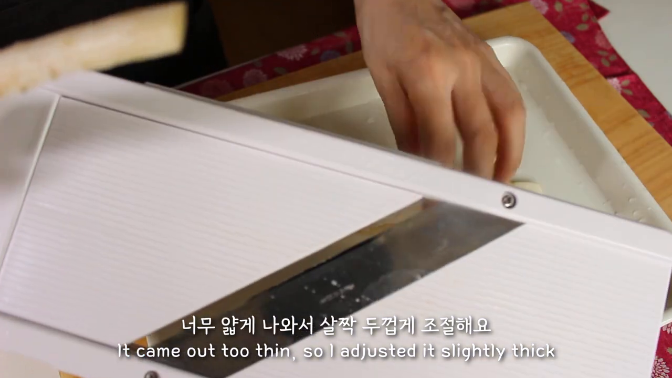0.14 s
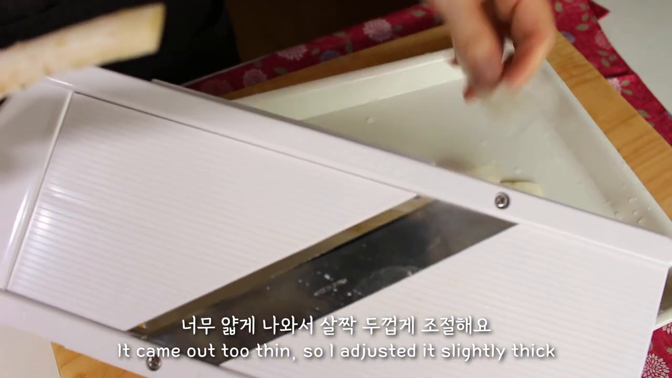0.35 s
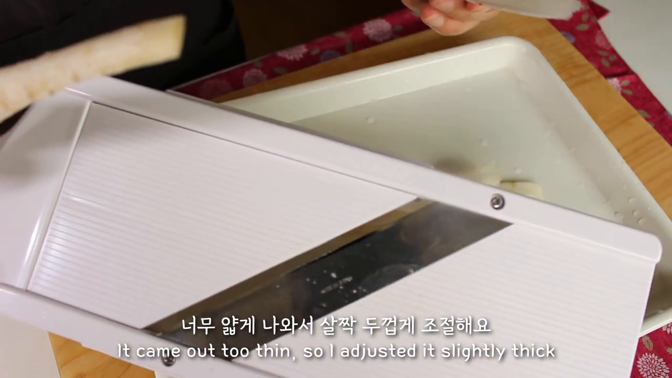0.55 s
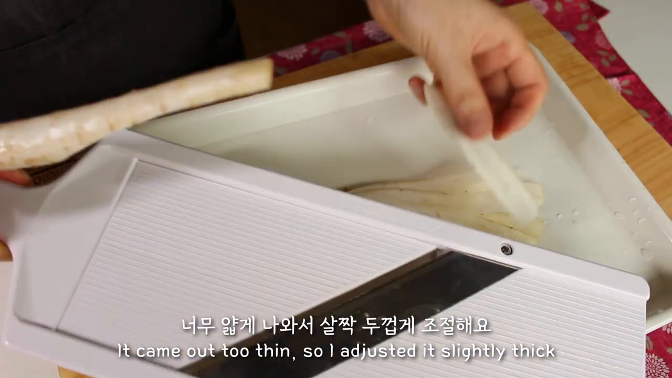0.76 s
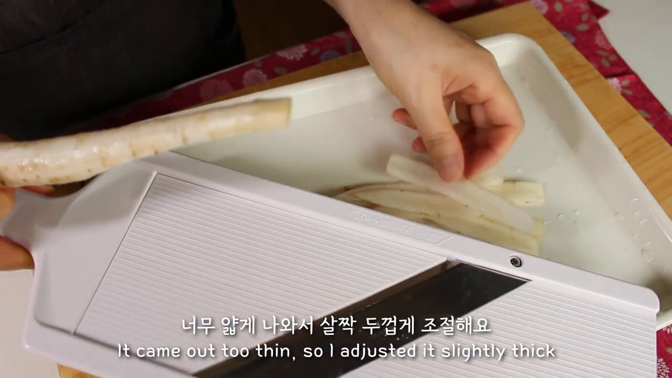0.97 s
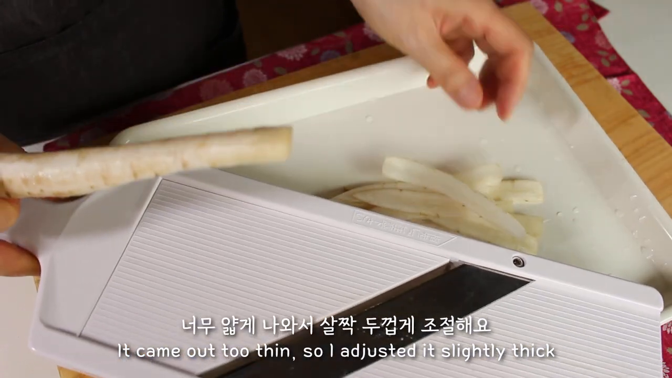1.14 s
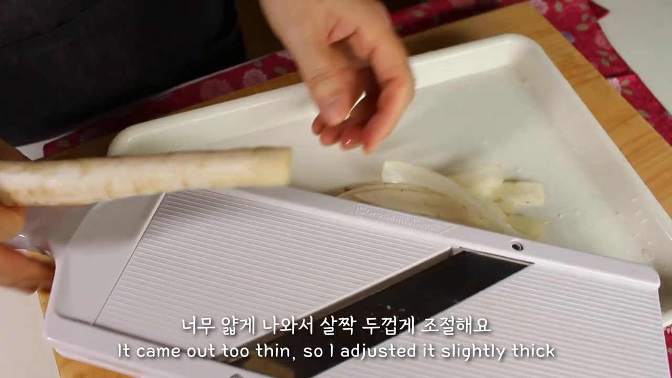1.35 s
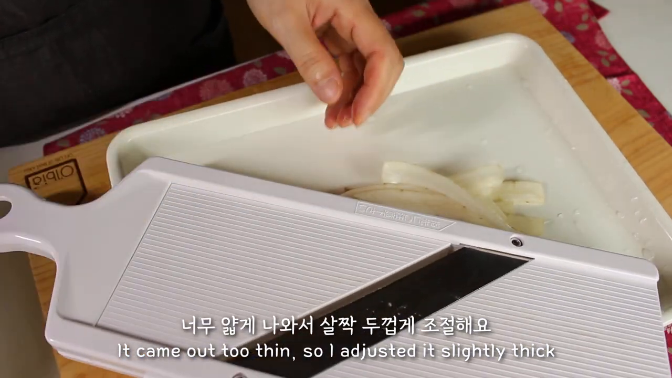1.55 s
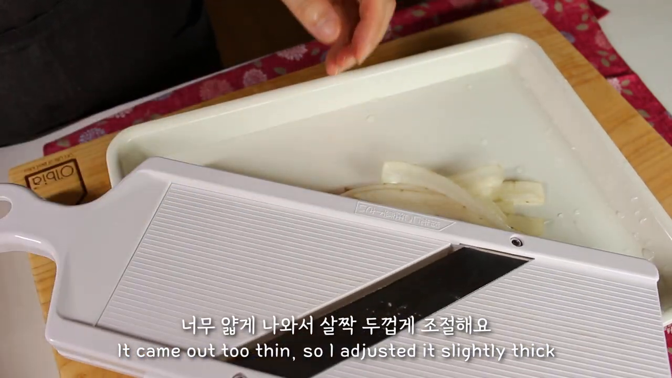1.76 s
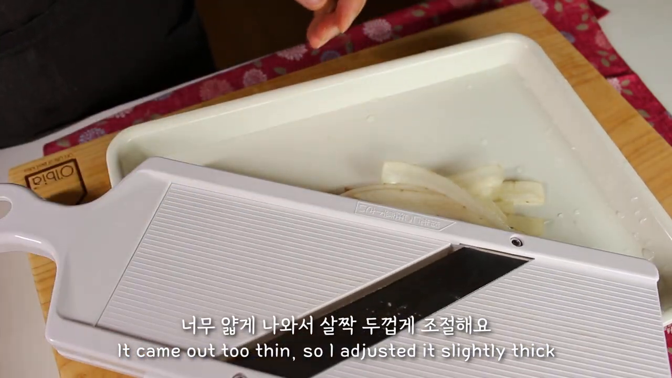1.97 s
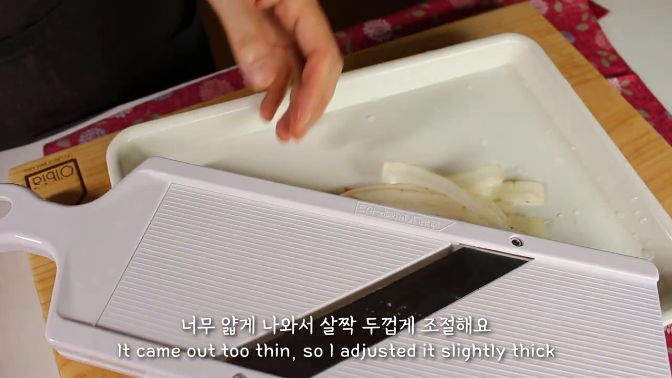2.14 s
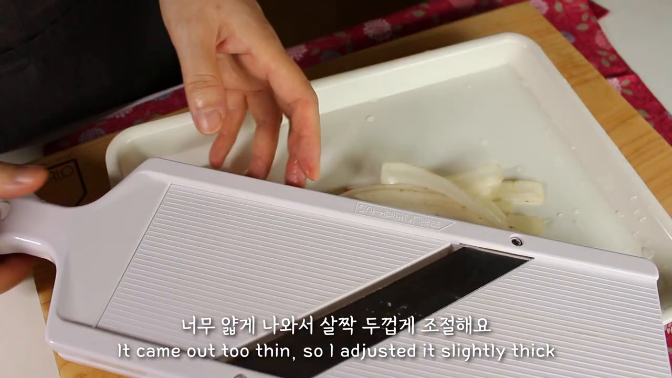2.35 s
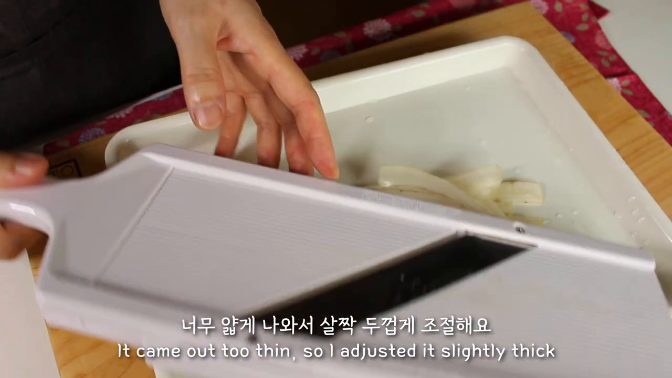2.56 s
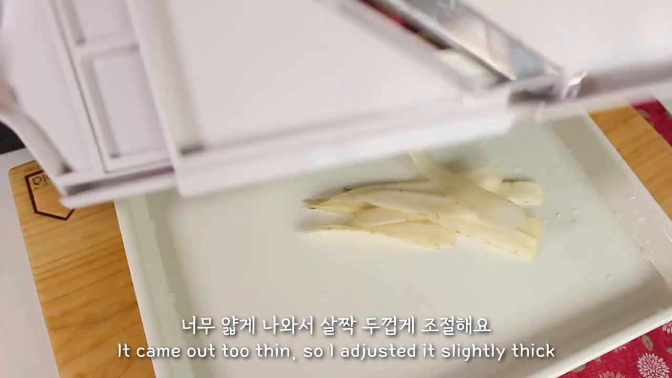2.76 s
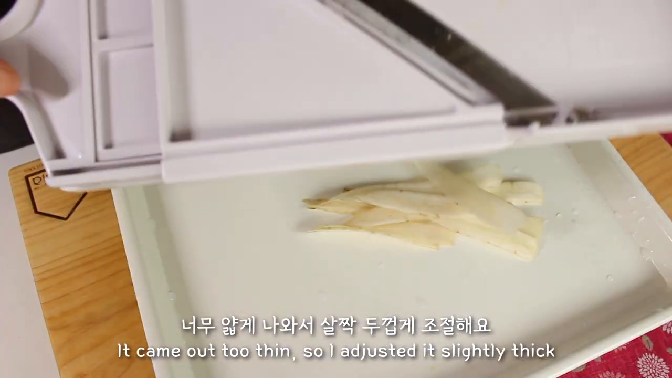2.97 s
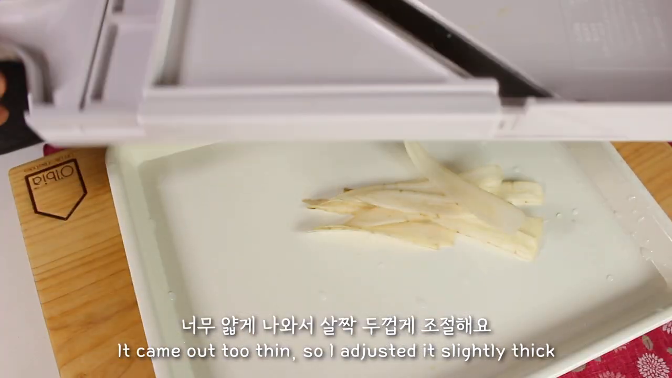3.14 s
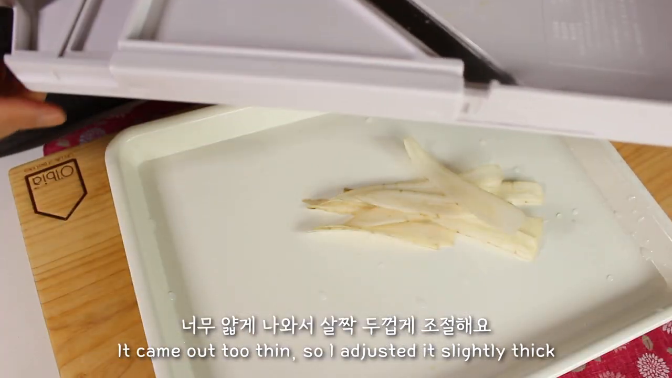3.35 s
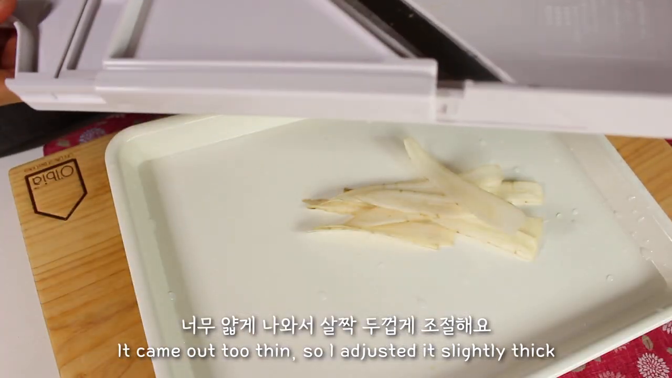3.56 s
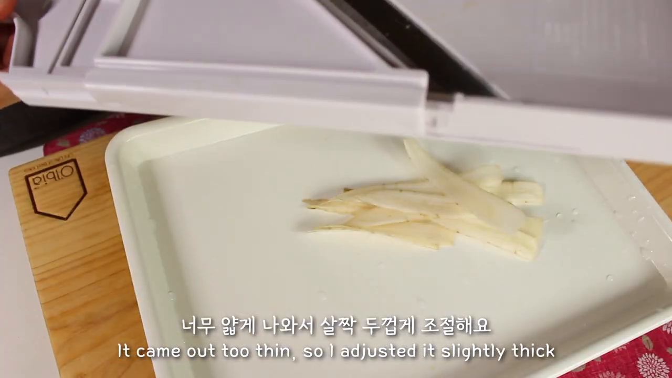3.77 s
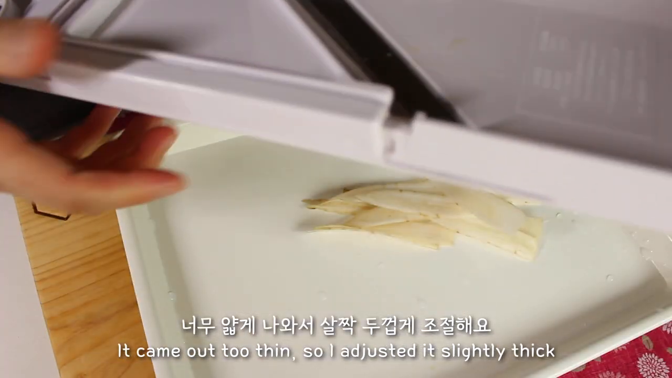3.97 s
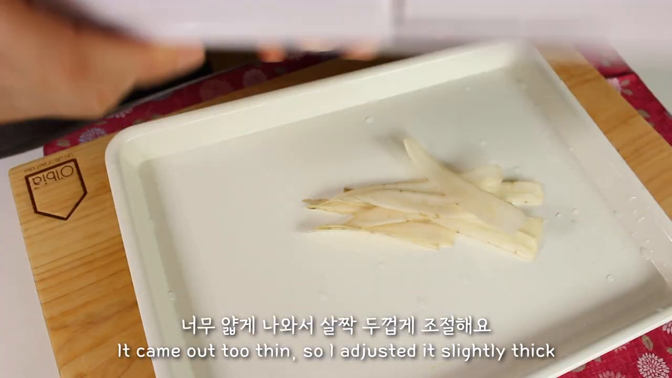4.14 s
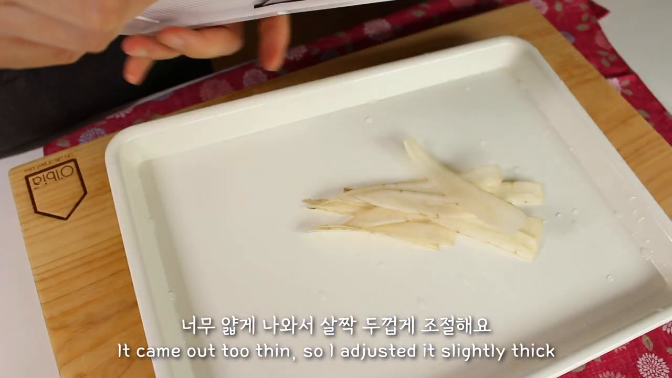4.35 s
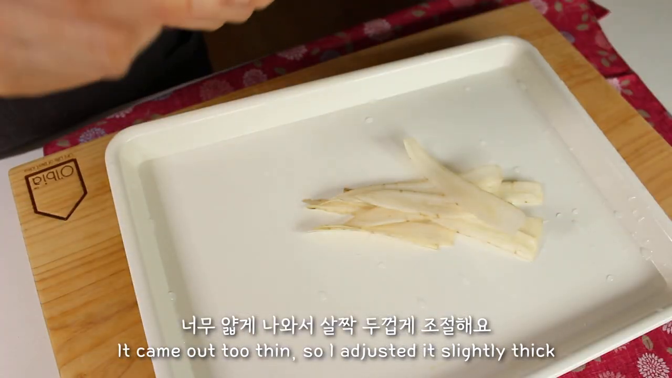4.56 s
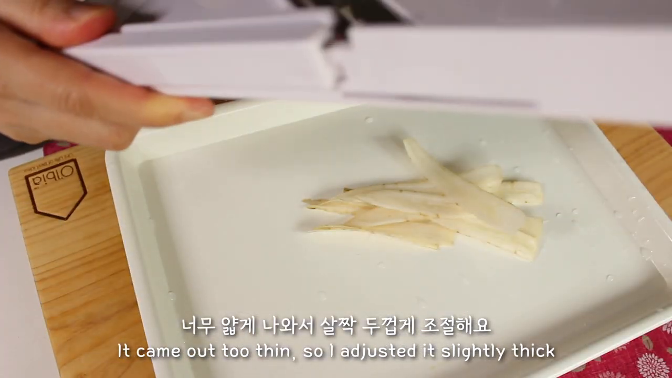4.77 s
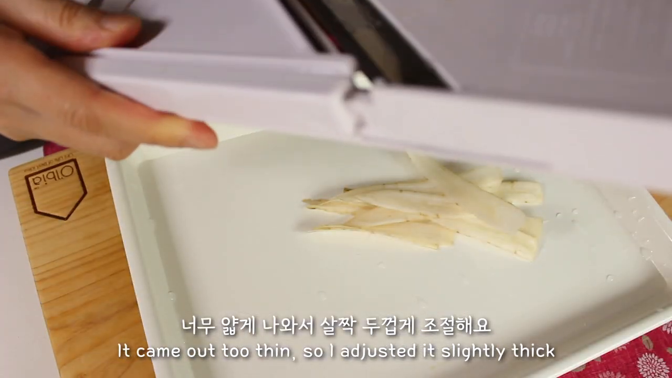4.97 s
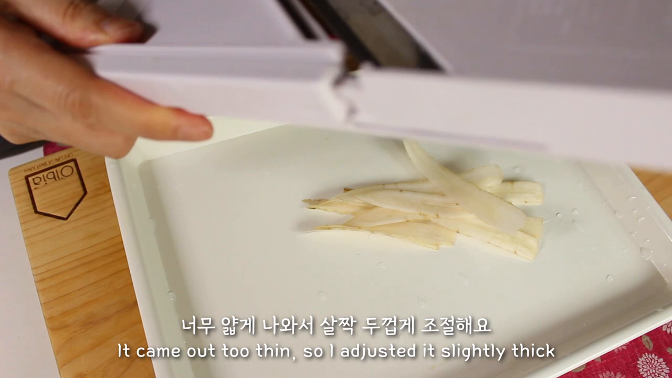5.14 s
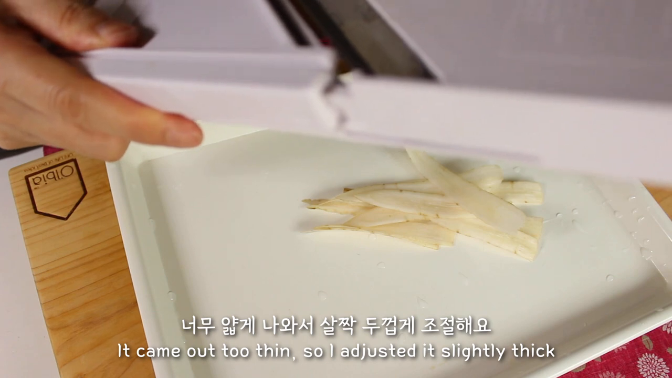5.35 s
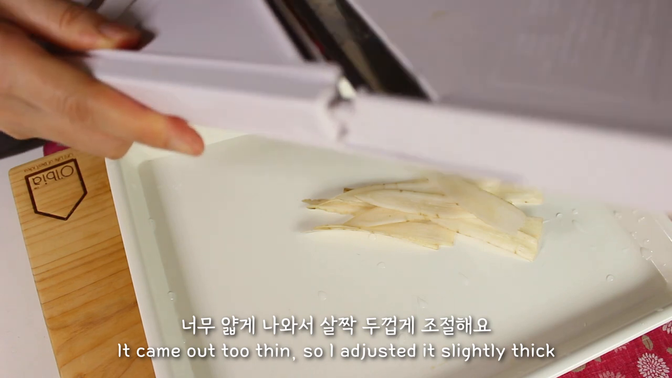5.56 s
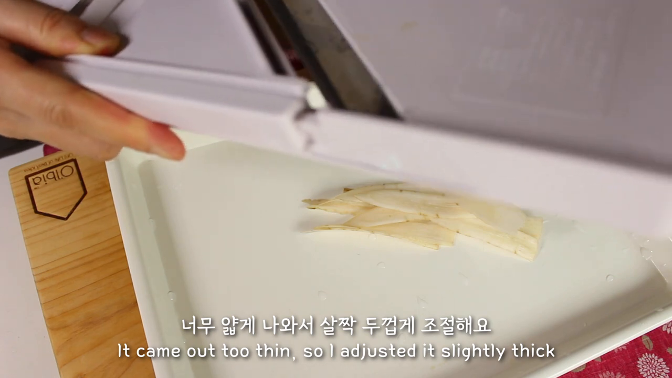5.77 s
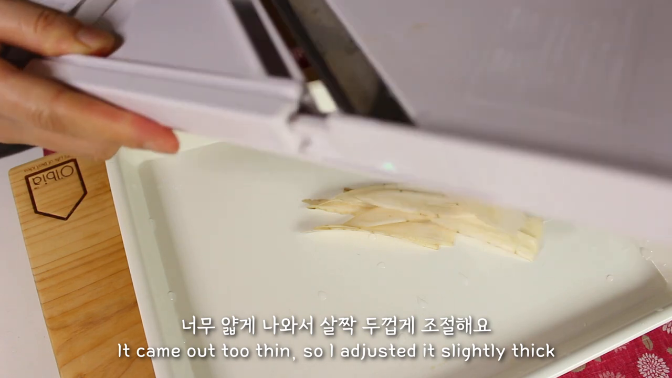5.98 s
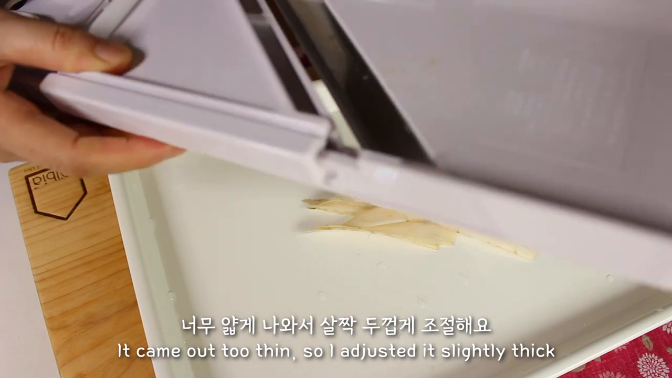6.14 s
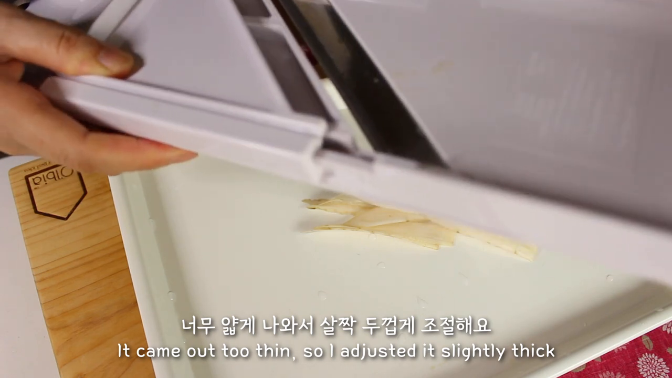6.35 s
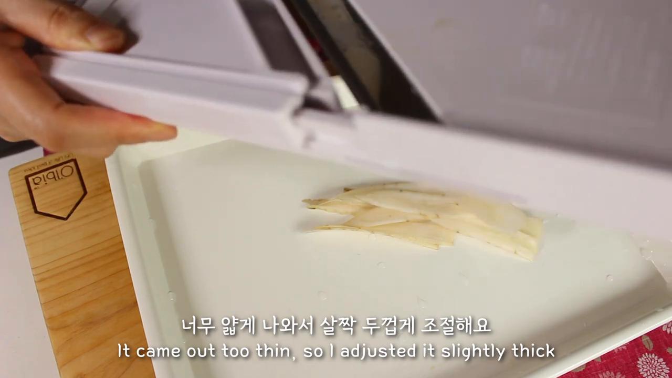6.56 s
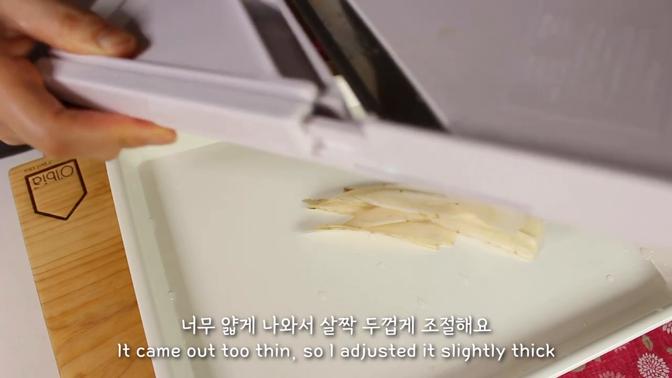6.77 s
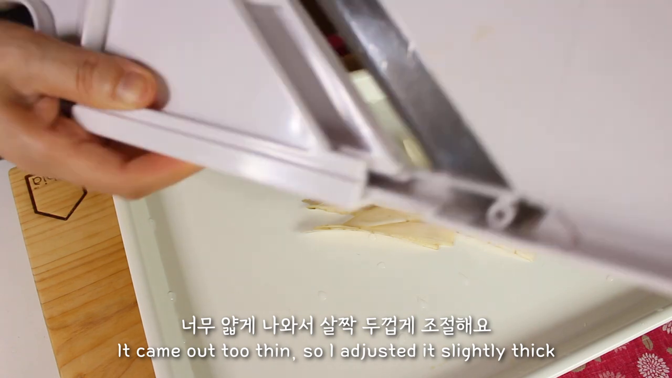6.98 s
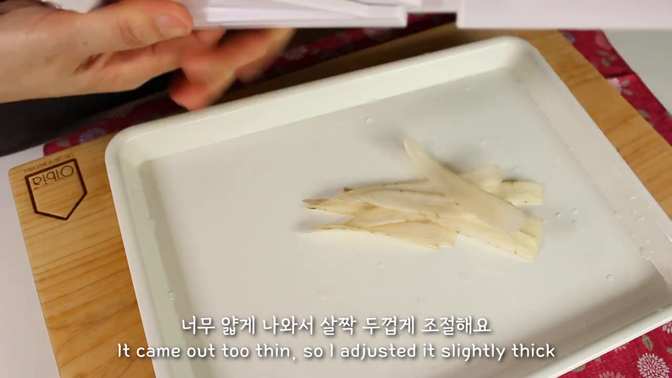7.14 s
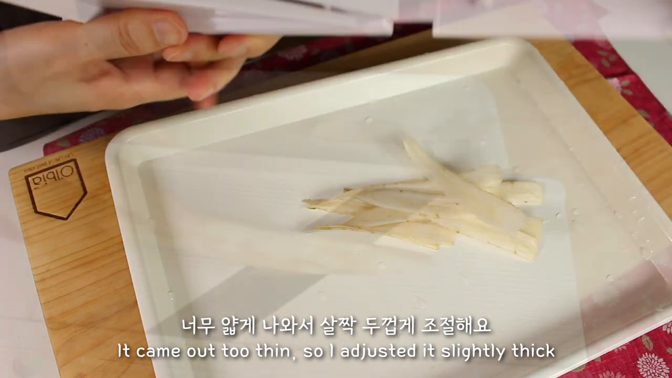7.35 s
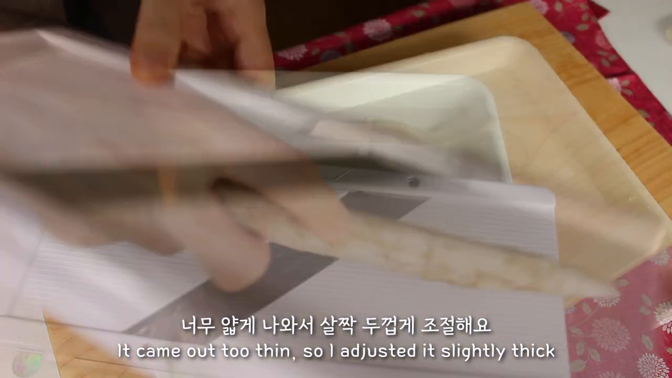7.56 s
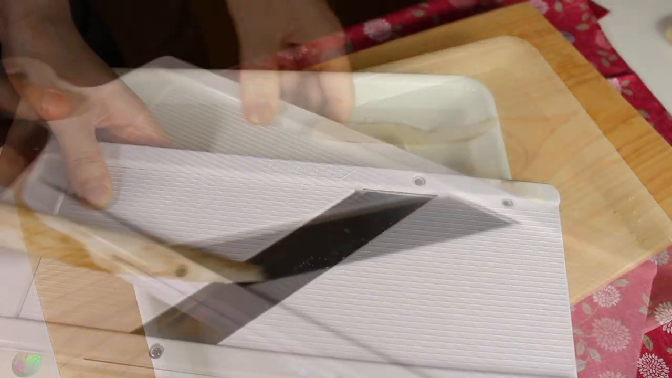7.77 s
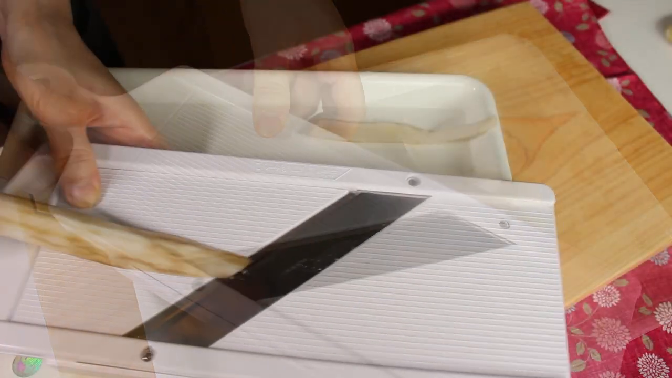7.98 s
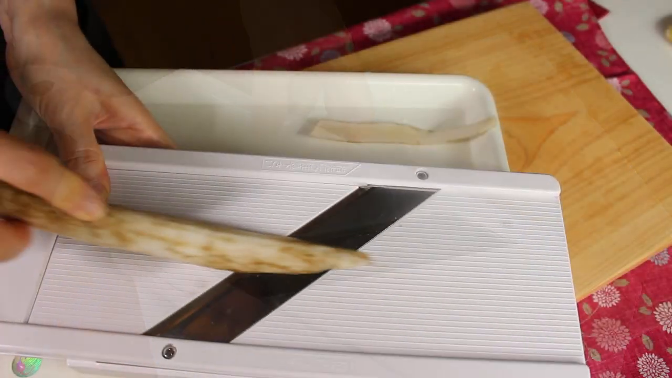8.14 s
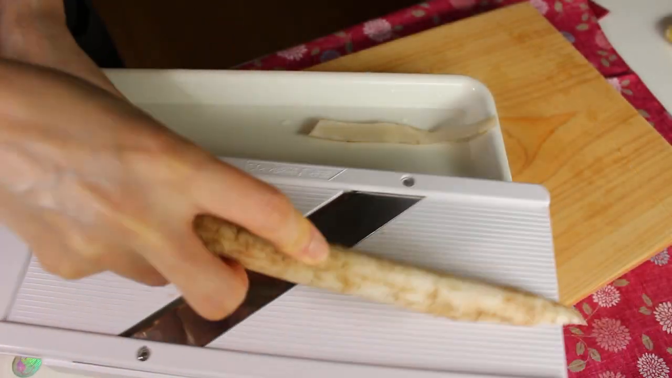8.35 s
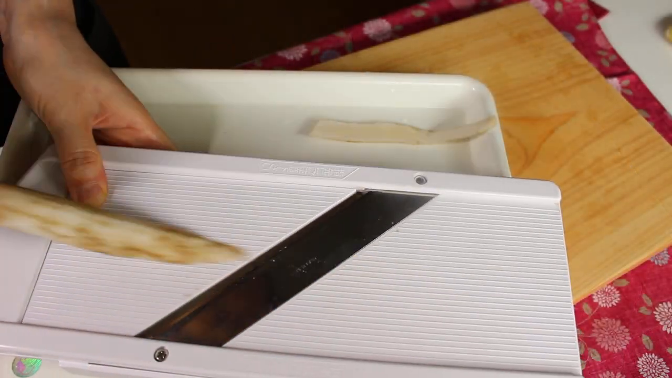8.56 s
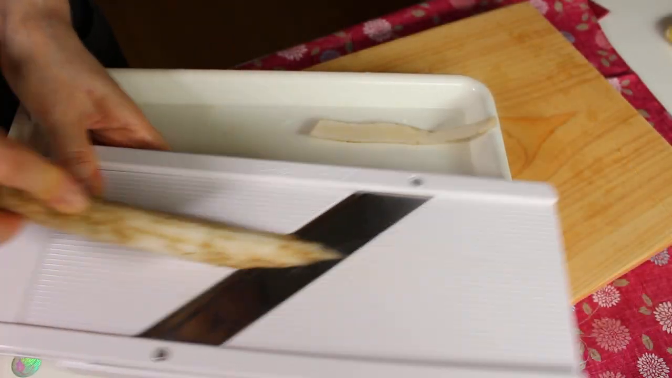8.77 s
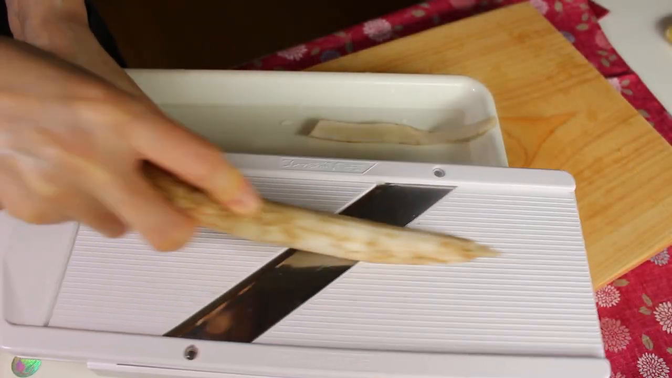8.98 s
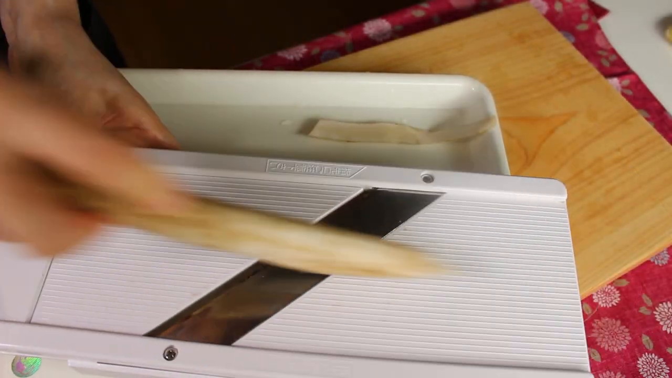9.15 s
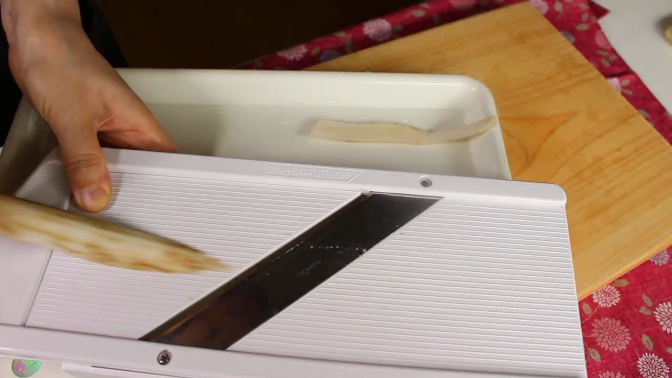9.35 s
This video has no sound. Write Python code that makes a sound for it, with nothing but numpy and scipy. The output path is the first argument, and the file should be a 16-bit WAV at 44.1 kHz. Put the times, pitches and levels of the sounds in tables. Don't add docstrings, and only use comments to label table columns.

```python
import sys
import numpy as np
from scipy import signal
from scipy.fft import rfft, irfft, next_fast_len
from scipy.io import wavfile
from scipy.ndimage import uniform_filter1d

SR = 44100
rng = np.random.default_rng(int(sys.argv[2]) if len(sys.argv) > 2 else 0)


def output_pcm(signal):
    pcm = np.clip(np.atleast_2d(signal).T, -1, 1) * 32767
    wavfile.write(sys.argv[1], SR, np.round(pcm).astype(np.int16))


def voltage_ratio(level):
    return 10 ** (np.asarray(level, float) / 20)


N = 414981
CUT_S, LIFT_S = 7.765, 1.3


def evened(x):
    return x / np.sqrt(np.mean(x ** 2) + 1e-20)


def smoothed(x, size):
    return uniform_filter1d(uniform_filter1d(x, size), size)


def read(points, hz):
    f, value = np.transpose(points)
    return np.interp(np.log(hz + 1), np.log(f + 1), value)


def add(mix, s, sound):
    part = mix[round(s * SR):][:len(sound)]
    part += sound[:len(part)]


def body(modes, hz, between_db=-16):
    response = voltage_ratio(between_db)
    for k, (f, width, db) in enumerate(modes):
        response = response + (-1) ** k * voltage_ratio(db) / (1 + 2j * (hz - f) / width)
    return response


def band(x, lo_hz, hi_hz):
    return signal.sosfilt(signal.butter(3, [lo_hz, hi_hz], "band", fs=SR, output="sos"), x)


def wander(rate_hz):
    t = np.arange(N) / SR
    rates = np.geomspace(rate_hz / 10, rate_hz, 12)
    return evened(sum(np.sin(2 * np.pi * (f * t + rng.random())) for f in rates))


def rings(rows, rise_s):
    out, u = np.zeros(N), np.arange(SR // 2) / SR
    for s, db, hz, t60 in rows:
        fade = voltage_ratio(db - 60 * u / t60) * np.minimum(u / rise_s, 1)
        add(out, s, fade * np.sin(2 * np.pi * hz * u))
    return out


def taps(rows, modes, rise_s=0.003, own_db=0.5, late_s=0.0028, own_width=380, round_s=0.002, snap=0.62):
    out, t, hz = np.zeros(N), np.arange(8192) / SR, np.fft.rfftfreq(8192, 1 / SR)
    puffs = rng.standard_normal((64, 8192))
    lead = 5 * rise_s
    away = np.hypot(t - lead, round_s) - round_s
    for puff, (s, db, ring_hz, low_db, hard_db, t60) in zip(puffs, rows):
        shape = np.where(t < lead, np.exp(-away / rise_s), voltage_ratio(-60 * away / max(t60, 0.01)))
        shape += (t > lead) * voltage_ratio(-11.0 - 60 * t / 0.17)
        tilt = read([(150, low_db - 2.0), (500, low_db + 3.0), (900, 0.27), (3000, 0.3),
                     (5000, hard_db + 7.5), (9000, hard_db - 4.5),
                     (15000, hard_db - 16.5 + 0.5 * (db + 21.0))], hz)
        own = voltage_ratio(own_db) / (1 + 2j * (hz - ring_hz) / own_width)
        colour = voltage_ratio(tilt) * (body(modes, hz) + own)
        blow = rfft(puff * shape)
        blow /= np.sqrt(uniform_filter1d(abs(blow) ** 2, 40))
        crack = snap * abs(colour) * np.exp(-2j * np.pi * hz * lead)
        sound = irfft((blow * colour + crack) * (hz > 100))
        peak = np.sqrt(uniform_filter1d(sound ** 2, 150).max())
        add(out, s - lead + late_s, voltage_ratio(db - 10.0) * sound / peak)
    return out


def friction(tables, modes, slips_per_s, spread_db, smooth, clump_db, top):
    slips = voltage_ratio(spread_db * np.minimum(rng.exponential(1, N), 4))
    slips *= rng.random(N) < slips_per_s / SR
    drive = evened(slips * rng.choice([-1, 1], N)) + smooth * rng.standard_normal(N)
    drive *= voltage_ratio(clump_db * evened(smoothed(rng.standard_normal(N), 250)))
    size = next_fast_len(N, True)
    hz = np.fft.rfftfreq(size, 1 / SR)
    rung = irfft(rfft(drive, size) * body(modes, hz) * voltage_ratio(read(top, hz)), size)[:N]
    middle, low, grit = [evened(band(rung, *edges)) for edges in ((750, 3700), (250, 750), (3700, 16000))]
    out = np.zeros(N)
    for rows in tables:
        s, force_db, low_db, grit_db = np.transpose(rows)
        at = np.arange(round(s[0] * SR), round(s[-1] * SR))
        mix = np.zeros(len(at))
        for rel_db, part in ((0, middle), (low_db, low), (grit_db, grit)):
            mix += voltage_ratio(np.interp(at / SR, s, force_db + rel_db)) * part[at]
        out[at] += mix * signal.windows.tukey(len(at), min(1, 500 / len(at)))
    return out


# pitch_hz, level_db (per Hz)
HISS = [(18, -38), (30, -9.5), (139, -5.5), (176, -11.5), (240, -8.5), (629, -15), (735, -14.5),
        (1370, -17.5), (2190, -23.5), (5800, -12), (8250, -24.5), (15000, -36.5)]


def air():
    frames, hz = N // 256 + 5, np.fft.rfftfreq(1024, 1 / SR)
    a, b, patches = rng.standard_normal((frames, 513, 3)).T
    patches = evened(uniform_filter1d(uniform_filter1d(patches, 10, 0), 14, 1))
    t = np.arange(frames) * 256 / SR
    room_db = np.where(t < CUT_S, 3 + 0.17 * t, 3.5)
    high_db = np.where(t < CUT_S, -4 + 1.25 * t, -1)
    share = np.clip((hz[:, None] - 2500) / 1500, 0, 1)
    level = (1 - share) * room_db + share * high_db
    level += (hz[:, None] < 260) * np.select([t < LIFT_S, t < CUT_S], [3, 2], 0.5)
    level += np.maximum(read(HISS, hz), -33)[:, None] + 2.0 * patches
    noise = signal.istft((a + 1j * b) * voltage_ratio(level), nperseg=1024, noverlap=768)[1][:N]
    tone = np.sin(2 * np.pi * 777 * np.arange(N) / SR) * voltage_ratio(-72 + 0.83 * wander(23))
    return voltage_ratio(-60.5) * evened(noise) + tone


# pitch_hz, fade_t60_s
ROOM = [(200, 0.066), (1000, 0.26), (4000, 0.25), (12000, 0.26)]


def kitchen(x):
    at = np.arange(300, SR // 2 - 20, 20)
    sparse = np.zeros(SR // 2)
    sparse[at + rng.integers(0, 20, len(at))] = rng.choice([-1., 1.], len(at))
    hz, t, z = signal.stft(sparse, SR, nperseg=256)
    tail = signal.istft(z * voltage_ratio(-60 * t / read(ROOM, hz)[:, None]), SR, nperseg=256)[1]
    return signal.fftconvolve(x, tail / np.linalg.norm(tail))[:N]


# start_s, peak_db, pitch_hz, fade_t60_s
BOUNCES = [(0.0, -46, 41.8, 0.25), (.77, -45, 46, 0.58), (.85, -49, 40, 0.22), (.95, -45, 28.2, 0.28),
           (1.14, -49, 42, 0.37), (1.335, -33.5, 41, 0.68), (1.42, -51, 37.3, 0.27),
           (1.59, -46.5, 36, 0.35), (1.86, -44, 41.1, 0.44), (1.95, -43, 38, 0.22), (2.04, -25, 43.8, 0.27),
           (2.14, -42, 33.8, .25), (2.22, -48, 46, 0.26), (2.49, -42, 33.8, 0.39), (2.54, -36, 45.6, 0.36),
           (2.61, -40, 37, 0.39), (2.79, -38, 39, 0.19), (4.039, -53, 41, 0.53), (5.845, -37, 42, .23),
           (6.218, -37, 42, 0.32), (7.75, -64, 41, 0.34), (7.93, -48.5, 44, 0.28), (8.02, -49, 54, 0.38),
           (8.13, -39.5, 40.6, 0.74), (8.22, -35, 25, 0.39), (8.29, -33, 35.8, 0.52),
           (8.34, -39, 56.1, 0.31), (8.48, -44, 51.1, 0.61), (8.78, -41, 46.5, 0.62), (8.9, -34, 35, 0.44),
           (8.95, -35.5, 45.7, 0.33), (9.08, -33, 39.8, 0.42), (9.17, -48, 60.6, 0.34),
           (9.27, -44, 44.7, 0.31)]
# start_s, peak_db
THUDS = [(2.819, -47), (8.31, -36), (1.281, -36), (1.859, -46), (2.046, -31.5), (2.537, -41.5),
         (4.071, -48), (5.856, -31.5), (6.238, -29.5), (9.08, -53)]


def table():
    thuds = [(s, db, 98, 0.12) for s, db in THUDS]
    return rings(BOUNCES, rise_s=0.036) + rings(thuds, rise_s=0.0075)


# pitch_hz, width_hz, level_db
SKIN = [(459, 37, -1.5), (690, 190, -1), (976, 220, -0.5), (1330, 98, 5), (1680, 210, -1), (2400, 150, -4),
        (2810, 75, -11.5), (3320, 130, -44)]
# start_s, length_s, force_db, low_body_db, grit_db
RUBS = [(0.802, 0.28, -61, -7, -26), (3.251, 0.19, -65, -11, -23), (4.044, 0.18, -56, -16, -11),
        (4.49, 0.18, -64, -12, -2.5), (5.03, 0.16, -58.5, -9.5, -19), (5.187, 0.16, -58, -5.5, -23),
        (5.335, 0.162, -53.5, -3, -15), (6.555, 0.25, -56.5, 2.5, -26), (7.422, 0.074, -56.5, -13, -15)]


def rub(s, length, db, low_db, grit_db):
    edge_s, edge_db = 0.081, -5
    shape = [(s, edge_db), (s + edge_s, 0), (s + length - edge_s / 2, 0), (s + length, edge_db)]
    return [(at, db + rel, low_db, grit_db) for at, rel in shape]


def finger_rubs():
    return friction([rub(*row) for row in RUBS], SKIN, slips_per_s=1100, spread_db=6.0, smooth=3.8,
                    clump_db=0.1, top=[(450, 1.0), (750, 0.0), (1700, 3.5), (2200, 5), (4000, 8),
                                       (9000, 3), (16000, -18)])


# pitch_hz, width_hz, level_db
HOLLOW = [(450, 77, -13.5), (998, 103, 6.5), (1790, 380, -16), (2520, 82, -19.5), (2640, 200, -28.5),
          (3530, 89, -18), (4100, 95, -17)]
# start_s, peak_db, ring_hz, weight_db, hardness_db
PATS = [(0.779, -17, 1010, -10.5, -20), (0.809, -24.5, 1130, -5, -20), (0.857, -26, 1030, -3.5, -20),
        (0.946, -22.5, 1830, -4, -21), (0.976, -35, 990, 4, -28), (1.326, -28, 840, 2, -40),
        (1.367, -26, 800, 3, -45), (2.455, -32.5, 1060, -12, -44), (2.493, -33, 1210, -2, -21)]


def pats():
    return taps([(*row, 0.044) for row in PATS], HOLLOW, rise_s=0.0021, own_db=1.0, late_s=0.0046,
                own_width=200, round_s=0.0047, snap=0.71)


# pitch_hz, width_hz, level_db
HELD = [(525, 88, 0), (992, 64, -1), (1690, 370, -7.5), (1891, 149, 2), (2123, 230, -10), (2840, 240, -3),
        (4400, 1300, -24), (4820, 230, 1), (7000, 8600, -7.5), (1433, 50, 0), (3460, 180, -26)]
# start_s, peak_db, ring_hz
TOUCHES = [(1.575, -43, 1160), (1.833, -55, 1210), (3.258, -42, 880), (4.028, -43.5, 1160),
           (4.066, -40.5, 1650), (4.548, -37.5, 1620), (4.859, -47, 1420), (5.195, -45, 1300),
           (5.3, -57, 1500), (5.316, -32, 1550), (5.421, -38.5, 1620), (5.437, -40, 1530),
           (5.452, -36, 1680), (6.598, -46, 1430), (6.689, -33, 1810), (6.852, -39, 2000),
           (7.086, -34.5, 925), (7.474, -47.5, 1420), (7.574, -48.5, 1700), (7.218, -27, 1380)]
# start_s, peak_db, ring_hz, weight_db, hardness_db
CLICKS = [(2.044, -12.5, 504, 5, -40), (2.812, -19.5, 1570, -19, -36), (2.82, -9.5, 1610, -9.5, -25),
          (2.827, -13, 2890, -15, -19), (2.966, -11, 1560, -21, -28.5), (7.248, -14.5, 1480, -13, -27.5),
          (3.155, -10, 3000, -8, -10.5), (3.829, -30.5, 1320, -19, -31), (4.087, -27, 1320, -34, -27),
          (4.103, -17.5, 1180, -32, -32), (4.122, -15, 1330, -32, -17.5), (4.171, -19, 1110, -64, -18),
          (4.925, -22, 1320, -10, -23), (4.985, -19.5, 1650, 1.5, -26), (5.047, -10.5, 1650, -13.5, -18),
          (5.478, -30.5, 1560, -4, -23), (5.593, -16, 2800, -4, -22.5), (6.114, -30.5, 1330, 0, -27),
          (6.132, -40, 3950, -22, 10), (7.027, -17.5, 1890, -9, -27.5), (7.149, -17, 2050, -15.5, -24.5),
          (7.342, -29, 1346, -11, -46), (7.686, -33, 820, 2.5, -36)]
# start_s, peak_db, ring_hz, weight_db, hardness_db
KNOCKS = [(1.285, -11, 1120, -31, -38), (1.89, -17.5, 2120, -8.5, -6), (2.016, -19, 3140, -1, -20),
          (2.07, -11, 1960, 3.5, -14), (2.534, -17, 1040, -3.5, -22.5), (5.854, -24.5, 2860, -30, -28),
          (6.236, -5, 1500, -21.5, -6), (7.233, -17, 2100, -14.5, -21.5)]


def handling():
    knocks = [(*row, 0.12 if row[4] > -10 else 0.091) for row in KNOCKS]
    clicks = [(*row, 0.023) for row in CLICKS]
    weight_db, hard_db, touch_t60 = -8.5, -19, 0.028
    touches = [(*row, weight_db, hard_db, touch_t60) for row in TOUCHES]
    return taps(knocks + clicks + touches, HELD)


# pitch_hz, level_db, fade_t60_s
STEEL = [(1210, -7, 0.2), (1420, -24, 0.23), (1830, 2.5, 0.22), (2180, -14.5, .1), (2900, -1, 0.2),
         (3300, -3, 0.16), (4160, -7.5, 0.15), (4630, -10.5, .2), (4810, -16.5, 0.33), (5210, -7, 0.072),
         (5470, -12.5, 0.16), (6250, -19.5, 0.24), (7100, -12.5, 0.0924), (7330, -18, 0.19)]
# start_s, peak_db, tilt_db (per octave)
JOLTS = [(1.894, -39, 3.5), (2.016, -32, 12.5), (2.078, -21, 7.5), (2.102, -44.5, 0), (5.859, -27, -7),
         (5.896, -39.5, -10.5)]


def blade():
    rows = []
    for s, db, tilt_db in JOLTS:
        luck = 2.5 * rng.standard_normal(len(STEEL))
        for (hz, rel, t60), odd in zip(STEEL, luck):
            rows.append((s, db + rel + odd + tilt_db * np.log2(hz / 3000), hz, t60))
    return rings(rows, rise_s=0.0058)


# start_s, force_db, hold_s, release_t60_s, grit_db
RASPS = [(1.283, -25, 0.0085, 0.064, -12), (2.009, -38.5, 0.024, 0.053, 4.5), (2.071, -28.5, 0.024, 0.2, 4),
         (5.852, -21, 0.038, 0.17, 0.5), (6.234, -21.5, 0.05, 0.091, -9)]


def rasp(s, db, hold, t60, grit_db):
    low_db = -11
    shape = [(s - 0.012, -42), (s, 0), (s + hold, 0), (s + hold + t60, -60)]
    return [(at, db + rel, low_db, grit_db) for at, rel in shape]


def slide_rasps():
    return friction([rasp(*row) for row in RASPS], HELD, slips_per_s=3200, spread_db=5.0, smooth=1.0,
                    clump_db=-2.0, top=[(3000, 6.5), (7000, -2.5), (9000, -5.0), (15000, -13.0)])


# pitch_hz, width_hz, level_db
LAID = [(510, 140, -18.5), (1010, 35, 0.5), (1320, 2800, -19), (1650, 31, -9), (2050, 580, -5.5),
        (2420, 110, -29), (2810, 100, -7), (3570, 140, -35), (4100, 2700, -27.5), (5100, 310, -26),
        (8460, 860, -10)]
# start_s, peak_db, hardness_db
CATCHES = [(8.028, -54, -10), (8.051, -48, 2), (8.121, -22.5, -33), (8.215, -27, -7), (8.239, -22, -12),
           (8.263, -17, -7), (8.301, -20, -6), (8.335, -24, -8), (8.384, -38, -23), (8.321, -20.5, -1),
           (8.364, -24.5, -20), (8.423, -32, -45), (8.474, -43.5, -40), (8.6, -38.5, -8),
           (8.748, -25.5, -20), (8.774, -31, -22), (8.8, -16, -36), (8.825, -23, -40.5), (8.876, -33, -12),
           (8.909, -41, 2), (8.926, -38, -8), (8.945, -27, -5), (8.966, -30, 1), (9.029, -15.5, -16),
           (9.043, -22.5, 1.5), (9.087, -16, -19), (9.151, -25, -20), (9.276, -34.5, -11.5)]


def catches():
    ring_hz, weight_db, t60 = 1040, -7.5, 0.038
    rows = [(s, db, ring_hz, weight_db, hard_db, t60) for s, db, hard_db in CATCHES]
    return taps(rows, LAID, rise_s=0.0035, own_db=6.8, late_s=0.0033, own_width=126,
                round_s=0.0041, snap=0.55)


# time_s, force_db, grit_db
STROKES = [
    [(8.005, -59.5, -15), (8.03, -46.5, -11), (8.11, -43, -16), (8.19, -42.5, -6.5), (8.25, -31.5, -9),
     (8.285, -42, -6), (8.33, -28.5, -17), (8.37, -51, -30), (8.41, -66, -12)],
    [(8.725, -63.5, -9), (8.77, -36.5, -15), (8.86, -45, -20.5), (8.885, -39.5, -8.5), (8.94, -32, -13),
     (9.0, -41.5, -10), (9.045, -35, -18), (9.075, -44.5, -19), (9.2, -68, -18)],
]


def stroke(force):
    return [(s, db, -5.5 - max(db + 58, 0), grit_db) for s, db, grit_db in force]


def root_strokes():
    return friction([stroke(force) for force in STROKES], LAID, slips_per_s=1300, spread_db=3, smooth=0.91,
                    clump_db=1.5, top=[(3000, 6.5), (7000, 11.7), (10000, 4.6), (16000, 3.4)])


def scene():
    hits = handling() + catches() + pats()
    rubbed = slide_rasps() + blade() + finger_rubs() + root_strokes()
    mono = voltage_ratio(1.0) * (hits + rubbed + voltage_ratio(-14.0) * kitchen(rubbed) + table() + air())
    return np.array([mono, mono])


# start_s, bass_rad, near_1_khz_rad, near_1600_hz_rad, top_band_rad
LOCKS = [(0, 0.7, -1.9, -2.9, 2.6), (0.79, -1.4, -0.7, 2.9, 0.1), (1.29, -2.2, -2.6, -2.1, 1.0),
         (1.9, -2.7, -0.2, 1.7, 2.7), (2.03, -1.5, 0.5, -1.0, -3.1), (2.1, -0.4, 1.2, -1.0, 3.1),
         (2.54, 0.8, 0.2, -0.2, -0.4), (2.83, 0.0, -2.1, -3.1, -1.9), (2.97, 0.3, 1.0, -2.4, 2.4),
         (3.16, 0.7, 1.9, -0.6, -1.9), (4.13, -3.0, 0.8, -2.4, -2.3), (4.95, 1.1, -0.4, 0.1, -2.0),
         (5.05, 2.2, 0.3, 0.5, 0.9), (5.6, 1.3, 1.6, 0.4, -2.0), (5.88, -0.8, -0.9, 2.4, 2.9),
         (6.26, 2.7, -1.1, -1.1, 1.0), (7.03, 3.1, 2.8, 0.4, 2.8), (7.15, 1.3, -3.0, -0.5, -0.6),
         (7.24, -2.2, -2.3, 1.6, 0.0), (7.8, 0.0, 1.7, -1.5, 2.0), (8.07, 1.7, 0.6, -0.5, -2.3),
         (8.25, 2.8, 0.5, -1.5, 0.1), (8.45, -2.4, -1.3, -0.4, 1.5), (8.77, -2.3, -1.0, -2.4, -0.0),
         (8.95, -2.3, -1.0, -1.9, -0.6), (9.05, -2.0, -1.0, -1.9, -0.6), (9.28, 1.8, -0.0, 1.8, -1.4)]


def roll_off(x):
    return signal.sosfilt(signal.butter(12, 16650, fs=SR, output="sos"), x)


def record(dry):
    hz, t, z = signal.stft(dry, SR, nperseg=1024, noverlap=768)
    s, bass, low, middle, top = np.transpose(LOCKS)
    since = np.clip(np.searchsorted(s - 0.03, t) - 1, 0, None)
    band_hz = 480
    bands = ((hz + rng.uniform(0, band_hz, (len(s), 1))) // band_hz).astype(int)
    held = np.take_along_axis(rng.uniform(-np.pi, np.pi, (len(s), 80)), bands, 1)
    held[:, (hz > 200) & (hz < 800)] *= 0.5
    held[0] *= 0.2
    held[:, hz < 230] = bass[:, None]
    held[:, hz > 7600] = top[:, None]
    held[:, (hz > 700) & (hz < 1450)] = low[:, None]
    held[:, (hz > 1450) & (hz < 2000)] = middle[:, None]
    held[np.ix_(s > CUT_S, (hz > 1800) & (hz < 3350))] = 2.8
    level_db = 20 * np.log10(uniform_filter1d(abs(z[0]), 5, 0) + 1e-9)
    faint = np.clip((-78 - level_db) / 12, 0, 1)
    drift = rng.standard_normal((len(t), len(hz))).T
    drift = evened(uniform_filter1d(uniform_filter1d(drift, 3, 0), 5, 1))
    turn = held[since].T + (0.65 + 2.2 * faint) * drift
    ears = (hz[:, None] < 15800) * z * np.exp(0.5j * np.array([turn, -turn]))
    wide = signal.istft(ears, SR, nperseg=1024, noverlap=768)[1][:, :N]
    return roll_off(wide)


dry = scene()
out = record(dry)
output_pcm(out)
```